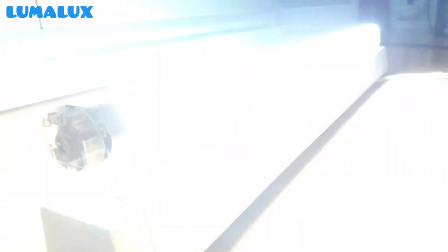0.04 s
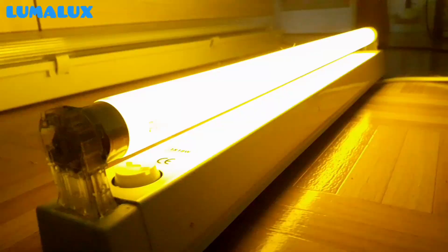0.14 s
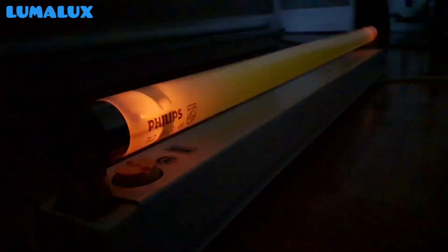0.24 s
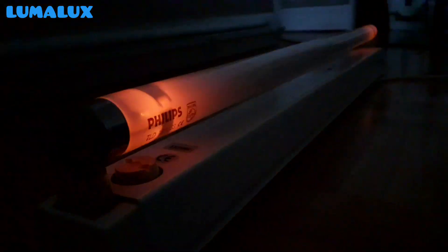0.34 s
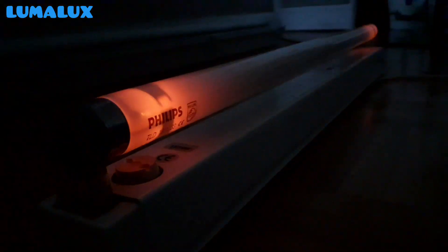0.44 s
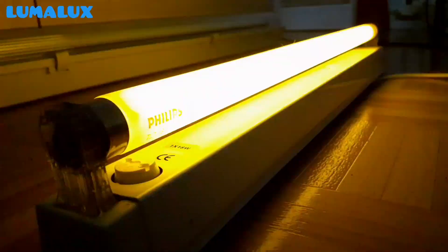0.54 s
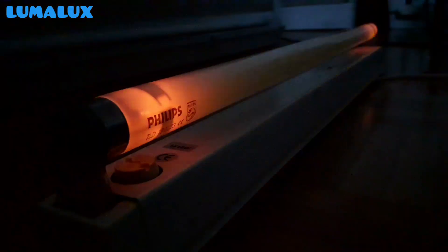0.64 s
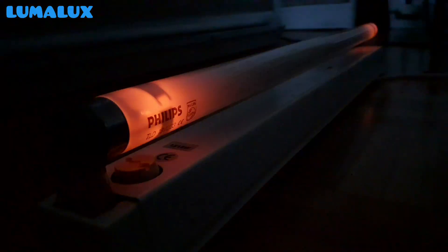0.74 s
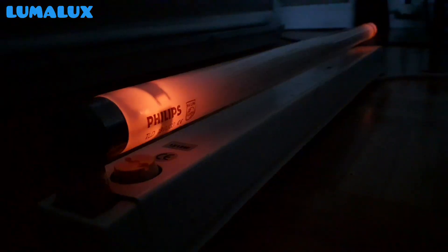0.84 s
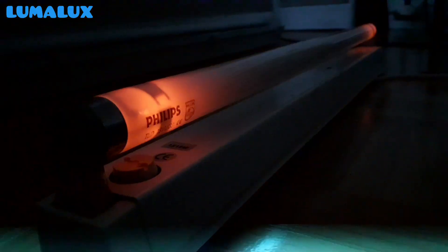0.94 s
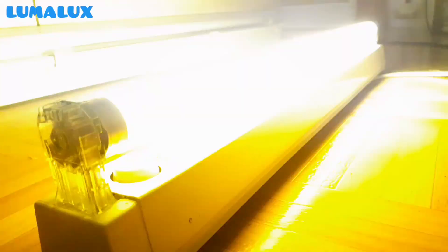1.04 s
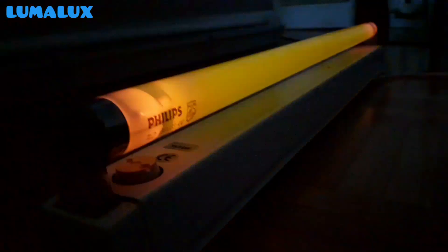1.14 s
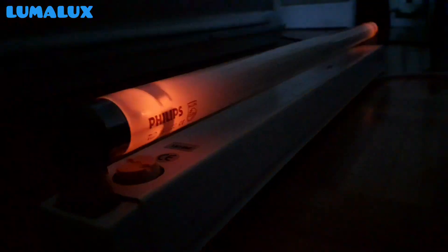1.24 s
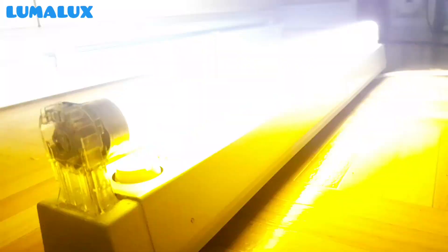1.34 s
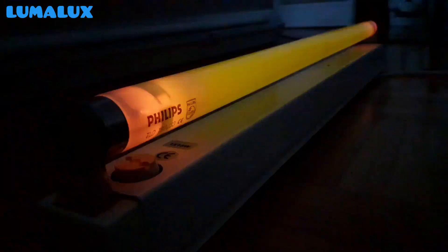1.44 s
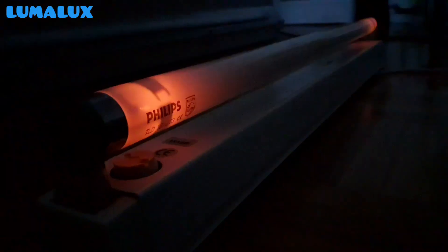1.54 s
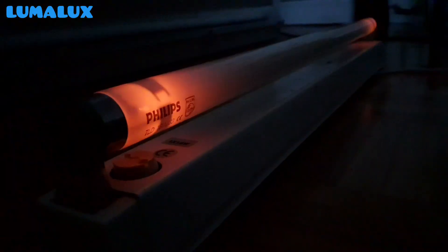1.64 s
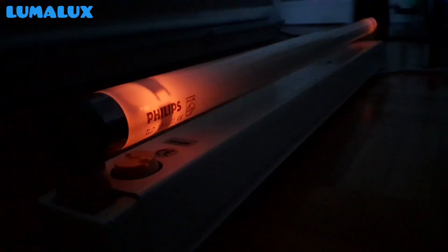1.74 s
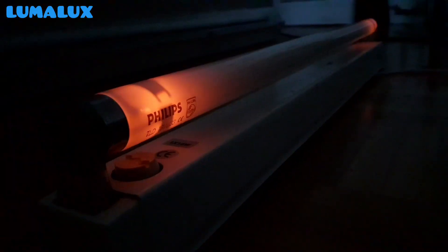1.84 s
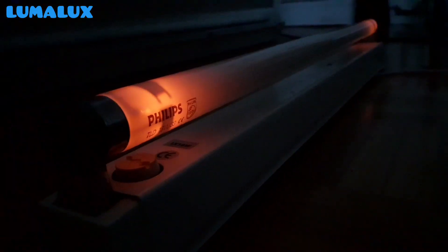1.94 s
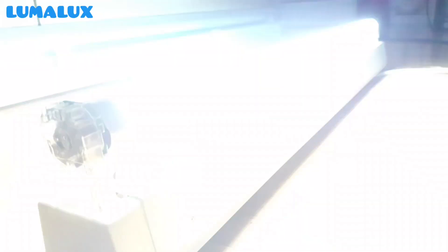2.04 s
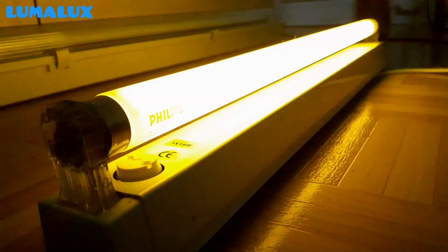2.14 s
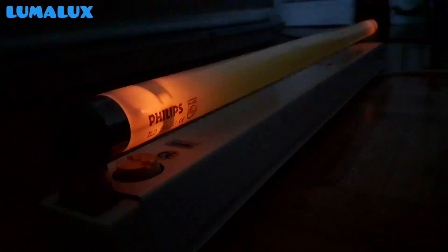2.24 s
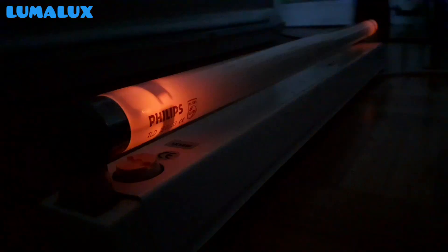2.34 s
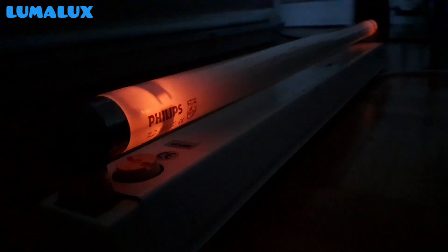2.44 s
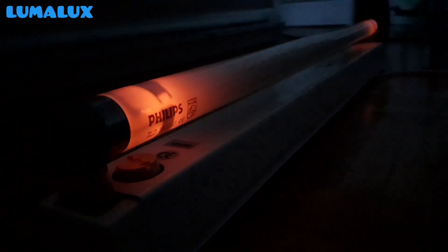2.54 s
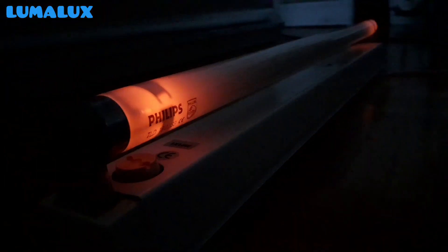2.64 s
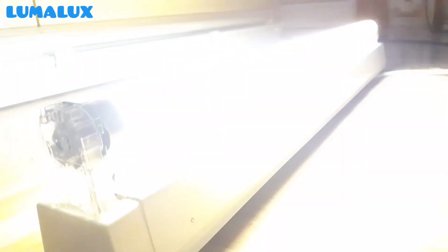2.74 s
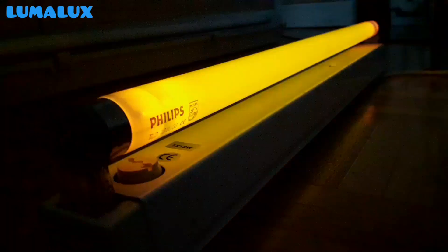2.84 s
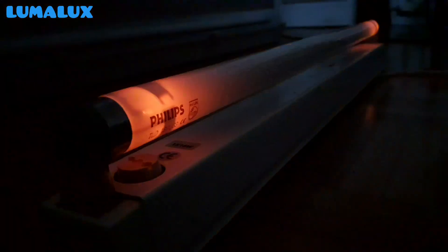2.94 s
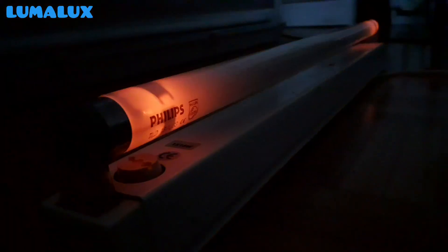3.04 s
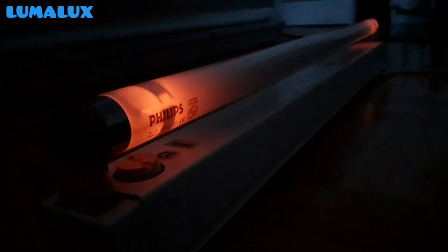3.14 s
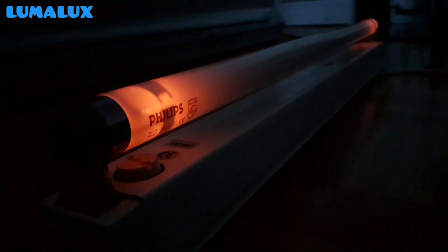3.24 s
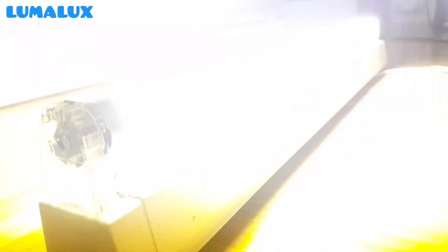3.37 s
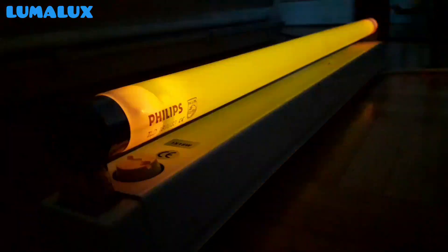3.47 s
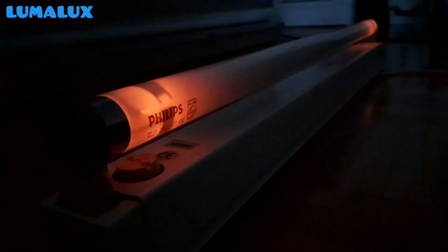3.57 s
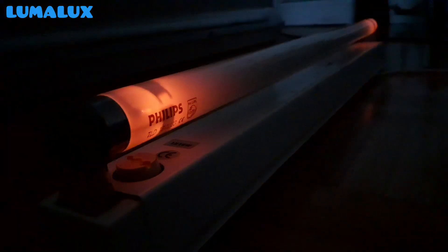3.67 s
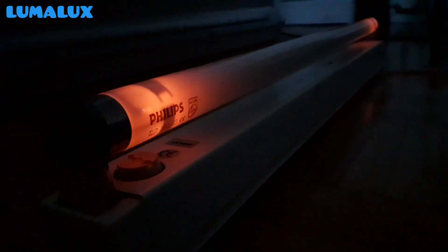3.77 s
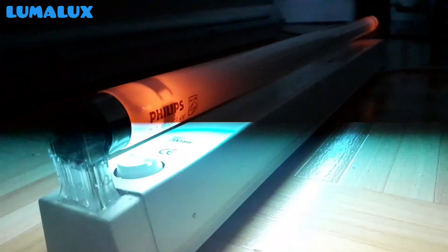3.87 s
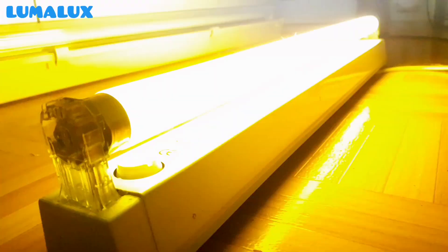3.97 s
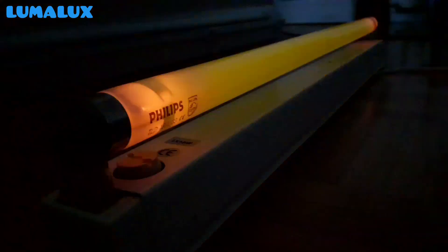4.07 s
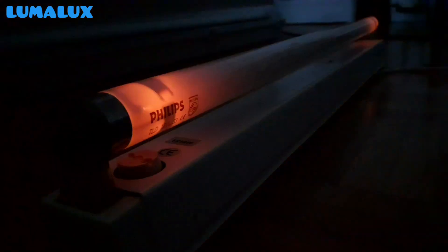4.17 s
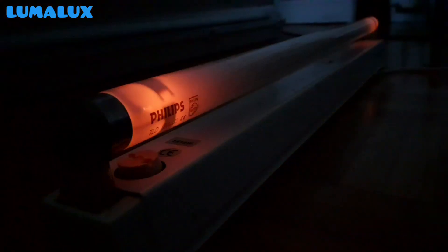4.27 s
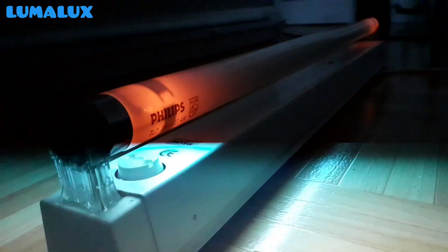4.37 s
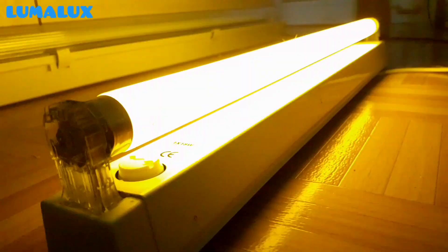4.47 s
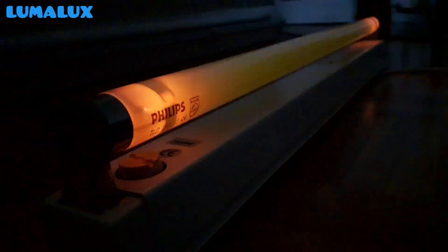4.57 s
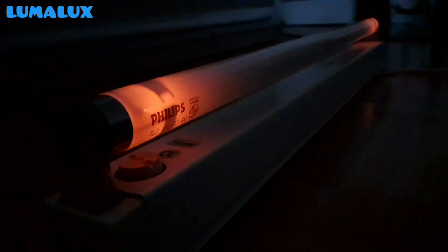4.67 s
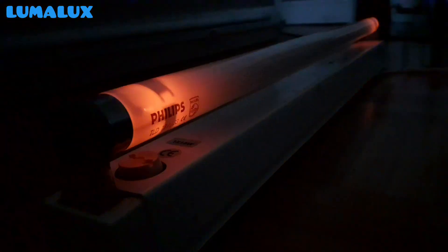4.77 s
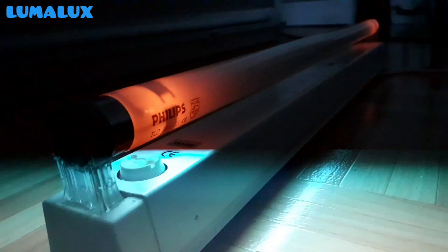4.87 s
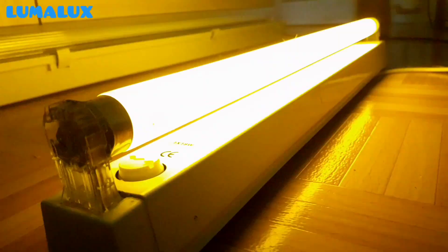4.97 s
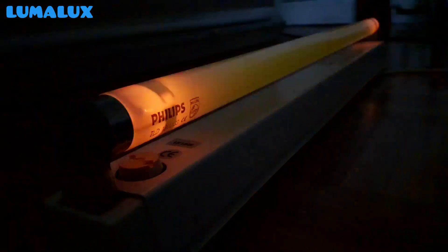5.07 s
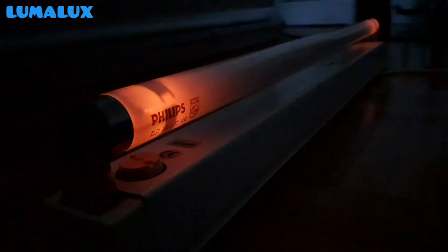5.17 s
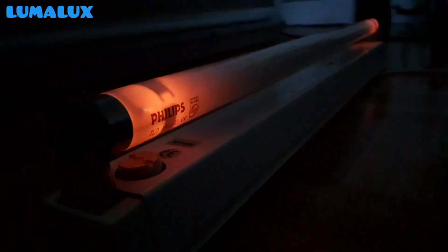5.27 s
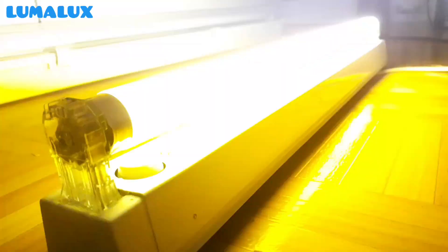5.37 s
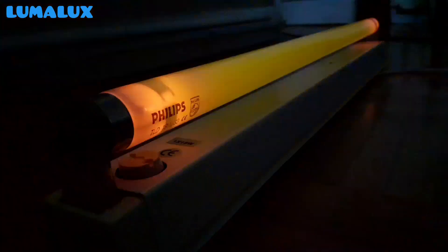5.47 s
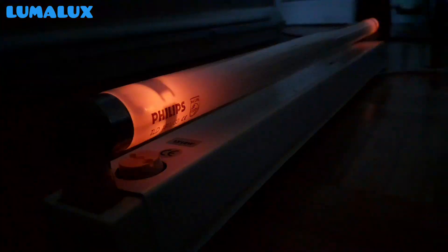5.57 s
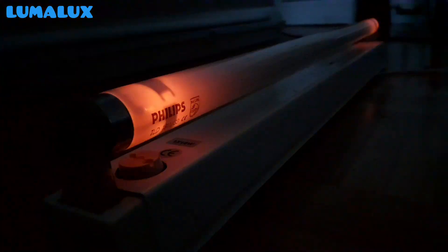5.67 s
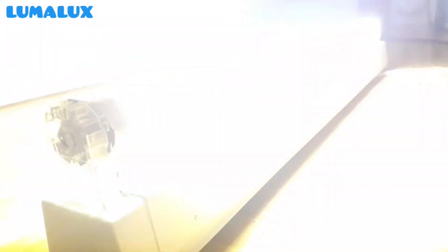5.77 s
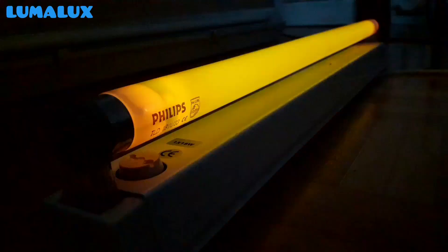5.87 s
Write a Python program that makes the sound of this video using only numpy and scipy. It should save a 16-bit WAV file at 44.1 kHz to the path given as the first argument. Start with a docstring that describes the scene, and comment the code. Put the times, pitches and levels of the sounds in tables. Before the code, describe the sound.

A close stereo take, weighted to the left, of a fluorescent lamp failing to start in a quiet room. A soft, gently wavering electrical hum, strongest around 400 Hz, runs throughout with low room air and thin hiss. Tries begin at about 0.05, 0.5, 1.0, 1.35, 2.05, 2.7, 3.4, 3.9, 4.4, 4.9, 5.4 and 5.75 seconds. Each lasts only 0.03 to 0.1 seconds: a tiny glassy ping, usually one or more growing jolts of the steel housing at mains rate, then a sharp spark snap, metallic knock and very high tick. The try at 1.0 has extra snaps, the one at 2.05 a contact bounce, and the one near 2.75 a strong rapid crackle of three flares. After knocks the hum thins for a moment and recovers. A barely noticeable soft low thump falls at 4.5. Clicks have short, bright nearby reflections and a brief room tail.

```python
"""A fluorescent tube on a wooden floor tries twelve times to light, in a quiet room with mains hum and faint hiss.
At each try the starter contact closes with a glassy ping, then the preheat current jolts the ballast and its
steel housing at the mains rate; in some tries the arc flares or the contact bounces with a snap; it opens with a
snap, a knock and a treble tick, and the knocked housing's ring briefly beats against the hum and thins it. A soft
low thump falls between two later tries. Struck parts are decaying modes and noise, the hum is a sum of sines."""
import sys
import numpy as np
from scipy import signal
from scipy.fft import rfft, irfft
from scipy.io import wavfile

SR = 44100
rng = np.random.default_rng(int(sys.argv[2]) if len(sys.argv) > 2 else 0)


def wav_out(sig):
    """Save sig, one row per channel (or a flat mono array), as 16-bit PCM at SR to the path in sys.argv[1]."""
    wavfile.write(sys.argv[1], SR, np.round(np.clip(np.atleast_2d(sig).T, -1, 1) * 32767).astype(np.int16))


N = 260631

MAINS_HZ = 50
TIME = np.arange(N) / SR
RING_TIME = TIME[:SR // 2]   # half a second for each struck response
SIDES = np.array([[1], [-1]])   # left, right

# Modes of the starter bulb and can. Each row: frequency in Hz, relative level in dB, t60 in s.
BULB_MODES = [(853, -6.5, 0.17), (1020, -4.5, 0.19), (1620, 1, 0.12), (1710, -14, .08), (1832, 2.5, 0.14),
              (2004, -6, 0.094), (2330, -6, 0.15), (7450, -26.5, 0.22)]
# Dense upper modes of the bulb. Each row: frequency in Hz, relative density in dB per Hz.
BULB_WASH = [(300, -19), (900, 3.5), (1350, -30), (1700, 6.5), (2350, -5.5), (2800, -19), (4000, -22.5),
             (8000, -21), (9500, -66), (16000, -19.5)]
# Broadband spectrum of the spark. Each row: frequency in Hz, relative density in dB per Hz.
SPARK_WASH = [(70, -24), (300, 7), (1000, -1.5), (2300, 8), (2900, -2), (4200, 2.5), (5200, -6.5),
              (7500, -5.5), (9500, -16), (12000, -9.5), (16000, -15)]
# Mode frequencies of the bimetal strip, in Hz.
STRIP_HZ = (13203, 13490, 14070, 14190, 15420)
# The same strip modes in order. Each row: relative level in dB, t60 in s.
STRIP_DECAY = [(3, 0.14), (-13, .06), (8, .035), (-1, 0.038), (-11, .035)]
# Dense upper modes of the strip. Each row: frequency in Hz, relative density in dB per Hz.
STRIP_WASH = [(300, -49), (9500, -38), (12500, -9.5), (14000, -3), (16000, -8.5)]
HARD_TICK_DB, SOFT_TICK_DB = -1.5, -9.5   # treble tick of a closing, relative to the ping


def starter():
    """Impulse excitation: closing rings the glass bulb, each snap sparks, and both ring the bimetal strip."""
    pings = [(s, ping) for s, ping, hard in closings()]
    sparks = [(s, spark) for s, knock, spark, tick in snaps()]
    ticks = [(s, ping + (HARD_TICK_DB if hard else SOFT_TICK_DB)) for s, ping, hard in closings()]
    ticks += [(s, tick) for s, knock, spark, tick in snaps()]
    strip_modes = [(hz, db, t60) for hz, (db, t60) in zip(STRIP_HZ, STRIP_DECAY)]
    arc = varied(lambda: wash(SPARK_WASH, crack_t60=0.024, tail_db=-9, rise_cycles=0.58), change_db=3)

    def bulb_response():
        """Modal superposition in the glass: clear modes over a dense wash."""
        dense = wash(BULB_WASH, crack_t60=0.11, tail_db=7, rise_cycles=3)
        return from_db(-3) * ringing(BULB_MODES) + from_db(-10) * dense

    def strip_response():
        """Modal superposition in the strip: clear treble modes over a dense wash."""
        dense = wash(STRIP_WASH, crack_t60=0.028, tail_db=-20, rise_cycles=7.3)
        return from_db(-14.5) * ringing(strip_modes) + from_db(-10.5) * dense

    bulb = strike(pings, bulb_response)
    spark = strike(sparks, lambda: from_db(-14) * arc())
    strip = strike(ticks, strip_response)
    return bulb + spark + strip


# Tries of the starter. Each row: contact closes in s, contact opens in s, relative levels in dB of the
# closing ping and of the first preheat jolt, then on opening of the housing knock, spark snap and treble tick.
TRIES = [(0.054, .133, -42.5, -40.5, -35, -37, -56), (0.5061, 0.531, -39.5, -42.5, -40.5, -39.5, -53),
         (0.9971, 1.0687, -45.5, -37, -43, -36, -44), (1.346, 1.375, -40.5, -44, -45.5, -43, -43.5),
         (2.054, 2.134, -42.5, -40.5, -46, -38, -68), (2.7267, 2.826, -37.5, -43.5, -43, -45, -41.5),
         (3.367, 3.4133, -40, -41, -36, -34.5, -62), (3.9169, 3.9749, -43, -39.5, -37.5, -35.5, -63),
         (4.418, 4.474, -44, -38.5, -36.5, -33, -40.5), (4.917, 4.977, -44.5, -38.5, -43, -35, -46),
         (5.367, 5.3967, -40.5, -41, -44, -37.5, -64), (5.7563, 5.816, -47.5, -40, -46.5, -40.5, -45)]
# A closing louder than this is hard: the current surges at once, knocks the housing
# and starts the jolts half a mains cycle sooner.
HARD_PING_DB = -41.25


def closings():
    """Threshold of contact force: each closing as (s, ping dB, whether it is hard)."""
    return [(close, ping, ping > HARD_PING_DB) for close, _, ping, *_ in TRIES]


# Flares of the arc, and one sharp snap as the contact bounces (at 2.0588 s), within a try. Each row:
# time in s, then relative levels in dB of the housing knock, spark snap and treble tick.
MID_TRY_SNAPS = [(1.0135, -32.5, -39, -38.5), (1.0554, -35.5, -40, -52), (2.0588, -65, -40.5, -46),
                 (2.756, -34, -30.5, -39), (2.775, -33.5, -31.5, -55), (2.7937, -38, -37, -51)]


def snaps():
    """Transient events: every opening, arc flare and contact bounce as (s, knock dB, spark dB, tick dB)."""
    openings = [(opens, knock, spark, tick) for _, opens, _, _, knock, spark, tick in TRIES]
    return openings + MID_TRY_SNAPS


# Modes of the steel housing. Each row: frequency in Hz, relative level in dB when jolted,
# relative level in dB when knocked, t60 in s.
HOUSING_MODES = [(203.8, -18.5, -20, 0.21), (251, -18.5, -18.5, 0.21), (393.7, -12.5, -27, 0.45),
                 (438, -2.5, -8, 0.4), (458, -15, -12.5, 0.47), (585.2, -4.5, -14.5, 0.35),
                 (621, -8.5, -11.5, 0.28), (692, -17, -20.5, 0.28), (808, -21, -17, 0.12),
                 (865.6, -29, -5, 0.16), (1013.5, -11, 2, 0.12), (1052, -24, -1, 0.1),
                 (1122, -27, -12, 0.13), (1286, -19.5, -15.5, 0.19), (1514, -8.5, -10.5, 0.13),
                 (1630, -9, -17, 0.2), (1820, -14, -5, 0.13), (1905, -19, -8, 0.088),
                 (2078, -15, -0.5, 0.051), (2290, -9.5, -5, 0.098), (2350, -6.5, -6, 0.062),
                 (3930, -18, -21, 0.099), (4287, -19, -23, 0.1), (6270, -19, -35, 0.096)]
# Dense upper modes of the housing. Each row: frequency in Hz, relative density in dB per Hz.
HOUSING_WASH = [(40, -32), (90, -13), (200, -6.5), (450, 5.5), (700, 5), (850, 8), (930, -19), (1070, -2.5),
                (1360, -14.5), (1650, 3), (2350, 1.5), (2700, -15), (4200, -14.5), (7400, -16.5),
                (9300, -31.5), (16000, -23)]
SURGE_KNOCK_DB = -2   # knock of a hard closing, relative to the ping


def housing():
    """Forced panel vibration: the ballast core jolts it each mains cycle; hard closings and snaps knock it."""
    knocks = [(s, ping + SURGE_KNOCK_DB) for s, ping, hard in closings() if hard]
    knocks += [(s, knock) for s, knock, spark, tick in snaps()]
    # the slow preheat pull bends the low panel modes; the sudden knock drives the stiffer middle ones
    pulled = from_db(-1) * ringing([(hz, jolt, t60) for hz, jolt, knock, t60 in HOUSING_MODES])
    knocked = from_db(-1.5) * ringing([(hz, knock, t60) for hz, jolt, knock, t60 in HOUSING_MODES])

    def jolt_response():
        """Slow excitation: the pulled modes with a slowly rising wash."""
        return pulled + from_db(-5) * wash(HOUSING_WASH, crack_t60=0.071, tail_db=-10.5, rise_cycles=1.4)

    def knock_response():
        """Sudden excitation: the knocked modes with a quickly rising wash."""
        return knocked + from_db(-6) * wash(HOUSING_WASH, crack_t60=0.034, tail_db=-11, rise_cycles=0.25)

    buzz = strike(preheat_jolts(), jolt_response)
    clack = strike(knocks, knock_response)
    return buzz + clack


FIRST_JOLT_S = 0.0187   # after a soft closing
LAST_JOLT_GAP_S = 0.013   # no jolt comes closer than this before the opening
JOLT_GROWTH_DB = 1   # from one mains cycle to the next


def preheat_jolts():
    """Periodic forcing: one jolt per mains cycle while the contact is closed, each stronger: (s, dB)."""
    jolts = []
    for close, opens, ping, buzz, *_ in TRIES:
        sooner = (ping > HARD_PING_DB) * 0.5 / MAINS_HZ
        first = close + FIRST_JOLT_S - sooner
        times = np.arange(first, opens - LAST_JOLT_GAP_S, 1 / MAINS_HZ)
        jolts += [(s, buzz + k * JOLT_GROWTH_DB) for k, s in enumerate(times)]
    return jolts


# Balance of the clicks at two microphones. Each row: frequency in Hz, left-right difference in dB.
CLICK_BALANCE = [(200, 5.1), (700, 2.2), (1300, 4.4), (2400, 4.8), (4400, 5.6), (8000, 6.8), (14000, 13)]
# Likeness of the clicks at two microphones. Each row: frequency in Hz, correlation from 0 to 1.
CLICK_LIKENESS = [(200, 0.95), (500, 0.82), (1000, 0.4), (2000, 0.15), (4000, 0.1), (15000, 0)]


def ringing(modes):
    """Modal superposition: decaying sines, each reaching the right microphone weaker and later in phase."""
    out = 0
    for hz, db, t60 in modes:
        lag = np.arccos(np.clip(at_hz(CLICK_LIKENESS, hz), -1, 1))
        level = db + SIDES * at_hz(CLICK_BALANCE, hz) / 2 - 60 * RING_TIME / t60
        build_up = 1 - np.exp(-RING_TIME * hz)
        phase = 2 * np.pi * (hz * RING_TIME + rng.random()) + SIDES * lag / 2
        out = out + build_up * from_db(level) * np.sin(phase)
    return out


# Ring-out in the room. Each row: frequency in Hz, t60 in s.
ROOM_TAIL = [(150, 0.16), (500, 0.28), (1000, 0.36), (2000, 0.24), (6000, 0.26), (15000, 0.28)]


def wash(spectrum, crack_t60, tail_db, rise_cycles):
    """High modal density: noise with a crack and a room tail decaying by octave; lows build up later."""
    noise = rfft(stereo_noise(spectrum, CLICK_BALANCE, CLICK_LIKENESS, size=len(RING_TIME)))
    hz = np.arange(noise.shape[1]) * SR / len(RING_TIME) + 1e-9
    out = 0
    for centre in 62.5 * 2. ** np.arange(9):
        # triangular octave bands that overlap to a flat sum
        band = irfft(noise * np.maximum(1 - abs(np.log2(hz / centre)), 0), len(RING_TIME))
        crack = from_db(-60 * RING_TIME / crack_t60)
        tail = from_db(tail_db - 60 * RING_TIME / at_hz(ROOM_TAIL, centre))
        build_up = 1 - np.exp(-RING_TIME * centre / rise_cycles)
        out = out + band * np.hypot(crack, tail) * build_up
    return unit_attack(out)


def unit_attack(response):
    """Level normalization: rms 1 over the first hundredth of a second."""
    return response / np.sqrt(np.mean(response[:, :SR // 100] ** 2))


def varied(respond, change_db):
    """Partial repeatability: a shared response plus a share that differs at every blow."""
    usual, change = respond(), from_db(change_db)
    return lambda: (usual + change * respond()) / np.hypot(1, change)


def strike(hits, respond):
    """Linear superposition: a response laid at every (s, dB)."""
    out = np.zeros((2, N + SR))
    for s, db in hits:
        at = int(np.clip(s * SR, 0, N))
        out[:, at:at + len(RING_TIME)] += from_db(db) * respond()
    return out[:, :N]


ECHO_DELAY_S, ECHO_DB = 0.001298, -2.5   # level relative to the treble of the click


def reflections(x):
    """Early reflection: small surfaces nearby return the treble of each click, smeared over a moment."""
    smear = rng.standard_normal((2, SR // 300))
    smear /= np.linalg.norm(smear, axis=1, keepdims=True)
    bright = signal.sosfilt(signal.butter(4, 3000, "high", fs=SR, output="sos"), x)
    smeared = signal.oaconvolve(bright, smear, axes=1)
    late = np.pad(smeared, ((0, 0), (int(ECHO_DELAY_S * SR), 0)))
    return x + from_db(ECHO_DB) * late[:, :N]


# Partials of the hum. Each row: multiple of the mains frequency, rms level in dB before waver,
# thinning and balance.
HUM_PARTIALS = [(4, -81.5), (6, -61), (8, -52), (10, -68.5), (12, -76), (14, -81), (20, -77), (22, -91)]
# Balance of the hum at two microphones. Each row: frequency in Hz, left-right difference in dB.
HUM_BALANCE = [(300, 7), (400, 4), (1000, 4.5)]
HUM_LAG_S = 0.00016   # right behind left


def hum(waver_db=1.75):
    """Harmonic synthesis: the core sings on mains multiples, each wavering; housing beats briefly thin them."""
    thinning = beat_thinning()
    out = 0
    for multiple, db in HUM_PARTIALS:
        hz = multiple * MAINS_HZ
        waver = np.interp(TIME, np.linspace(0, TIME[-1], 60), rng.standard_normal(60))
        level = db + thinning + waver_db * waver + SIDES * at_hz(HUM_BALANCE, hz) / 2
        cycles = hz * (TIME + SIDES * HUM_LAG_S / 2) + rng.random()
        out = out + np.sqrt(2) * from_db(level) * np.sin(2 * np.pi * cycles)
    return out


THINNING_DB, FULL_KNOCK_DB = -8, -35   # depth after a knock of full strength
THINNING_DELAY_S, THINNING_HALF_S = 0.089, 0.024   # deepest point after the opening; half length


def beat_thinning():
    """Beating: the knocked housing's ring thins the hum, drawn as a gain curve in dB, deeper for hard knocks."""
    thinning = 0
    for _, opens, _, _, knock, *_ in TRIES:
        depth = THINNING_DB * from_db(knock - FULL_KNOCK_DB)
        age = TIME - opens - THINNING_DELAY_S
        thinning = thinning + depth * np.exp(-(age / THINNING_HALF_S) ** 2)
    return thinning


# Balance of the background at two microphones. Each row: frequency in Hz, left-right difference in dB.
AIR_BALANCE = [(60, 6.1), (200, 5.2), (700, 1.3), (1300, 0.87), (4400, 3.9), (8000, 1.4), (15000, .5)]
THUMP_AT_S, THUMP_DB, THUMP_HZ, THUMP_T60_S = 4.51, -55, 77, 0.089


def thump():
    """Damped oscillation: a soft low bump, over in a few cycles."""
    age = np.maximum(TIME - THUMP_AT_S, 0)
    level = THUMP_DB - 60 * age / THUMP_T60_S + SIDES * at_hz(AIR_BALANCE, THUMP_HZ) / 2
    return from_db(level) * np.sin(2 * np.pi * THUMP_HZ * age)


# Room air. Each row: frequency in Hz, relative density in dB per Hz.
AIR = [(25, -28), (60, -4.5), (130, 3.5), (240, 1.5), (430, 6.5), (650, 1), (1000, 1.5), (1450, -10.5),
       (1900, -6), (2800, -22.5), (4000, -13.5), (6300, -31.5)]
# Microphone hiss. Each row: frequency in Hz, relative density in dB per Hz.
HISS = [(3000, -7.5), (6000, -11), (7600, -14), (8600, -19), (9600, -29), (10500, -6.5), (12000, -1.5),
        (15700, -0.5)]
# Likeness of the background at two microphones. Each row: frequency in Hz, correlation from 0 to 1.
AIR_LIKENESS = [(60, 0.52), (300, 0.34), (640, 0), (1400, 0), (3000, 0), (15000, 0)]


def room_tone():
    """Stationary random noise: soft room air under a thin microphone hiss."""
    even_size = N + N % 2
    air = from_db(-63) * stereo_noise(AIR, AIR_BALANCE, AIR_LIKENESS, size=even_size)
    hiss = from_db(-68.5) * stereo_noise(HISS, AIR_BALANCE, AIR_LIKENESS, size=even_size)
    return (air + hiss)[:, :N]


def stereo_noise(spectrum, balance, likeness, size):
    """Random-phase synthesis: coloured noise at two partly correlated microphones; rms 1."""
    hz = np.arange(size // 2 + 1) * SR / size
    mid, side = np.exp(2j * np.pi * rng.random((2, len(hz))))
    alike = np.clip(at_hz(likeness, hz), -1, 1)
    both = np.sqrt(1 + alike) * mid + np.sqrt(1 - alike) * side * SIDES
    level = at_hz(spectrum, hz) + SIDES * at_hz(balance, hz) / 2
    return rms_one(irfft(both * from_db(level), size))


def from_db(db):
    """Logarithmic level: decibels to amplitude gain."""
    return 10 ** (np.asarray(db) / 20)


def rms_one(x):
    """Level normalization: unit rms."""
    return x / np.sqrt(np.mean(x ** 2) + 1e-20)


def at_hz(points, hz):
    """Logarithmic frequency axis: read a table by interpolation."""
    knots, values = np.transpose(points)
    return np.interp(np.log(hz + 1e-9), np.log(knots), values)


def scene():
    """Superposition of sources: starter and housing with reflections, then thump, hum and room tone."""
    return reflections(starter() + housing()) + thump() + hum() + room_tone()


def record(dry):
    """Band limiting: a steep elliptic low-pass cuts the top."""
    return signal.sosfilt(signal.ellip(10, 0.2, 80, 15900, fs=SR, output="sos"), dry)


dry = scene()
out = record(dry)
wav_out(out)
```